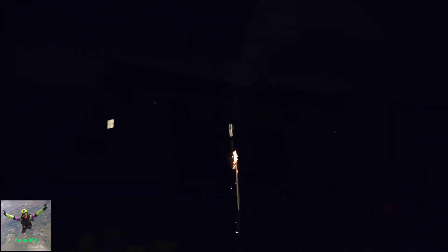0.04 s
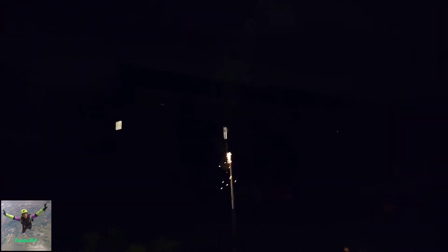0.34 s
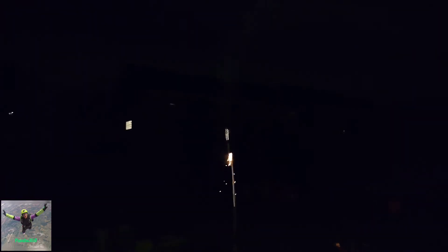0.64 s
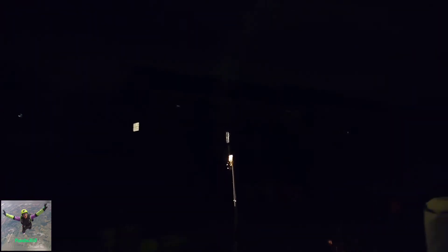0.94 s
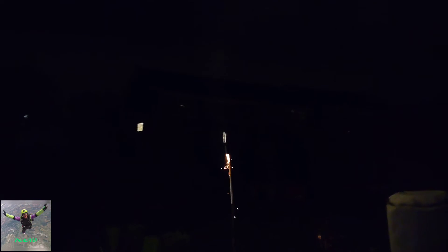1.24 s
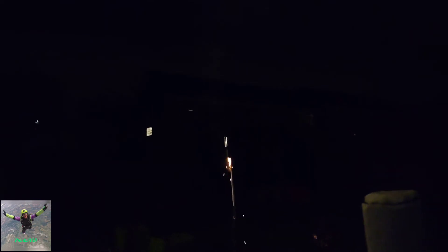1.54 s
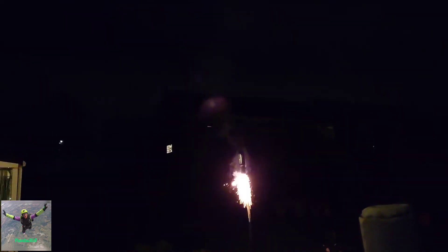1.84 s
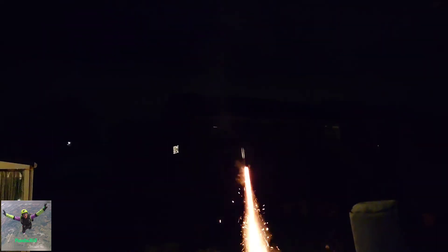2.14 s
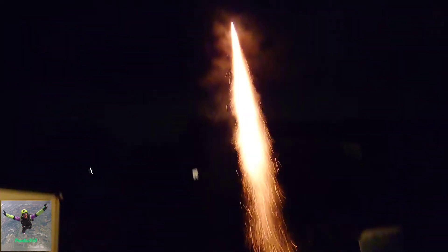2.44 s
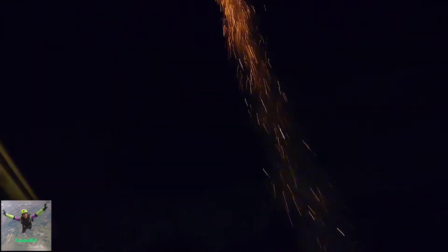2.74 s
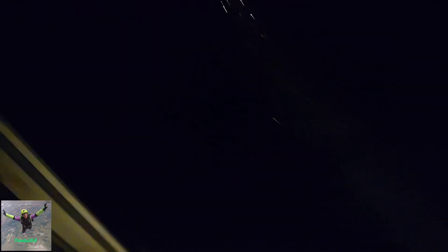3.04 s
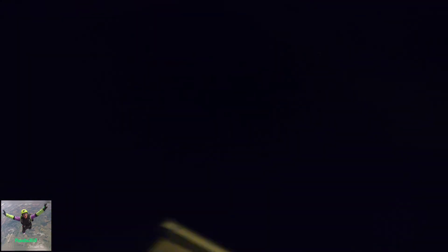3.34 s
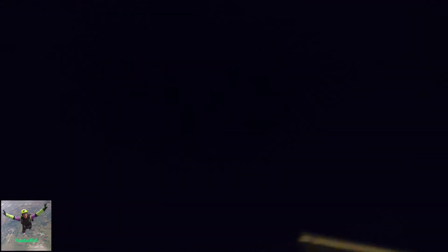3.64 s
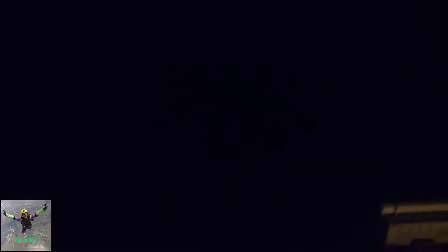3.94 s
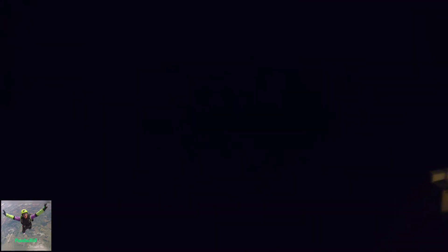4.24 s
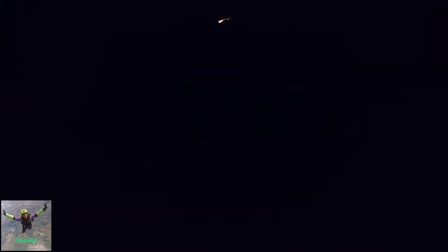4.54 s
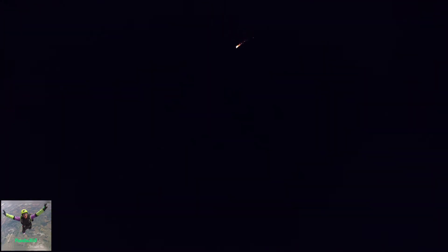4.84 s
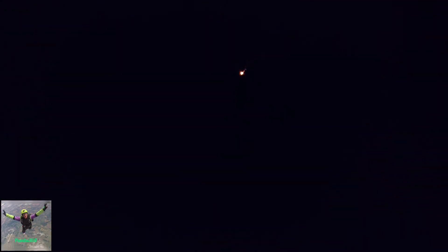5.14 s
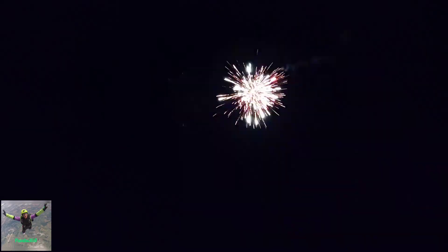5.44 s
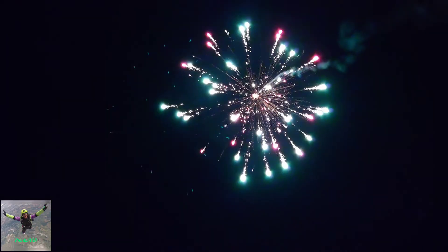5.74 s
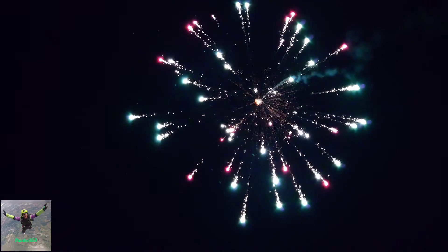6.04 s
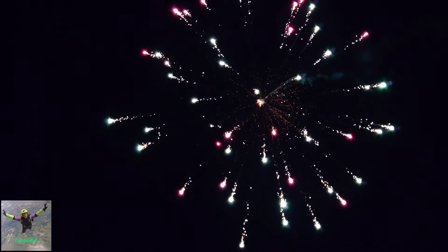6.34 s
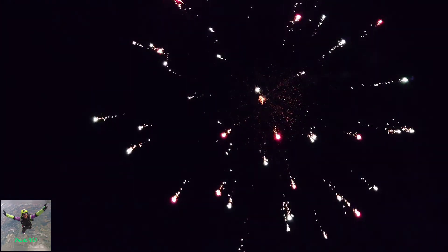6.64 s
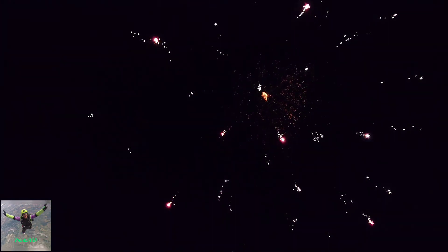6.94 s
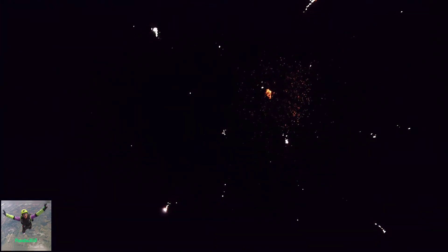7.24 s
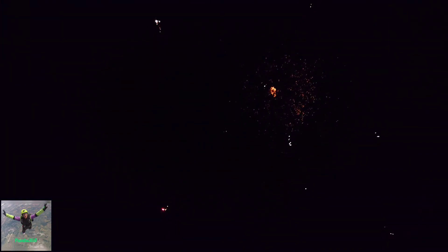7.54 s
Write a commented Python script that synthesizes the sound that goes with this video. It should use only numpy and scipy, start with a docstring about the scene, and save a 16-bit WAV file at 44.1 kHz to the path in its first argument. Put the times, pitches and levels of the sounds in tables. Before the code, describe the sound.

A firework fuse fizzes, the rocket launches with a loud whoosh, then bursts with a sharp echoing bang and crackling stars.

```python
"""A fuse fizzes in a yard at night, then flares as the powder of a firework rocket catches.
The exhaust roars upward, its tone swept by the ground echo, and the rocket coasts on a faint hiss.
The shell bursts with a shock that rolls among the houses; its stars sizzle and crackle.
All the while a finger lies over the left port of the hand-held microphone, muffling that side
and rubbing and bumping on it. Underneath are a far wash, fluttering air and a few dull knocks."""
import sys
import numpy as np
from scipy import signal
from scipy.fft import rfft, irfft
from scipy.io import wavfile
from scipy.ndimage import uniform_filter1d, map_coordinates

SR = 44100
rng = np.random.default_rng(int(sys.argv[2]) if len(sys.argv) > 2 else 0)


def generate_wav(signal):
    """Clip the signal to [-1, 1] and save it as 16-bit WAV at the path in sys.argv[1]."""
    frames = np.transpose(np.atleast_2d(signal))
    scaled = np.clip(frames, -1, 1) * 32767
    pcm = np.round(scaled).astype(np.int16)
    wavfile.write(sys.argv[1], SR, pcm)


N = 338678
TIME = np.arange(N) / SR
FRAME_S = np.arange(N // 128 + 5) * 128 / SR
BIN_HZ = np.fft.rfftfreq(512, 1 / SR)


def amp(db):
    """Decibels to gain."""
    return 10 ** (np.asarray(db) / 20)


def unit(x):
    """Scales to rms 1."""
    return x / np.sqrt(np.mean(x ** 2) + 1e-20)


def read(points, hz):
    """Reads a table along a log-frequency axis."""
    f, value = np.transpose(points)
    return np.interp(np.log(hz + 1), np.log(f + 1), value)


def follow(rows, t):
    """The columns of an automation table at the times t."""
    s, *columns = np.transpose(rows)
    return [np.interp(t, s, c) for c in columns]


def bell(x, centre, half_width):
    """A bell curve, 1 at the centre and 1/e a half-width away."""
    return np.exp(-((x - centre) / half_width) ** 2)


def burn(full_s, out_s, rise_db_per_s, fade_db_per_s):
    """Envelope that rises to 1 at full_s, holds until out_s and fades."""
    early, late = np.maximum(full_s - TIME, 0), np.maximum(TIME - out_s, 0)
    return amp(-rise_db_per_s * early - fade_db_per_s * late)


def swells(rows):
    """Envelope of overlapping swells, each fading as soon as it peaks."""
    return np.sqrt(sum((amp(db) * burn(s, s, rise, fade)) ** 2 for s, db, rise, fade in rows))


def add(mix, s, sound):
    """Adds a sound into the mix at s seconds."""
    part = mix[..., max(round(s * SR), 0):][..., :sound.shape[-1]]
    part += sound[..., :part.shape[-1]]


def colour(x, points, size=4096):
    """Minimum-phase EQ through (Hz, dB) points."""
    log_gain = np.log(amp(read(points, abs(np.fft.fftfreq(size, 1 / SR)))))
    taps = np.fft.ifft(np.exp(np.conj(signal.hilbert(log_gain)))).real[:size // 2]
    return signal.oaconvolve(x, taps.reshape((1,) * (x.ndim - 1) + (-1,)), axes=-1)[..., :x.shape[-1]]


# The finger's muffling EQ. Each row: frequency in Hz, gain in dB.
FINGER_EQ = [(100, -5), (250, 0), (900, -2.5), (1700, -8), (3300, -1), (4400, -3), (5600, -42.5),
             (11000, -23), (15000, -45)]
def covered(pair):
    """The finger muffles the left port."""
    return np.array([colour(pair[0], FINGER_EQ), pair[1]])


# Stereo image, narrow lows and wide highs. Each row: frequency in Hz, left-right correlation.
PORT_LIKENESS = [(60, 0.83), (130, .85), (290, 0.74), (640, 0.74), (1400, 0.14), (3000, 0.11),
                 (15000, 0.15)]
def ports(z, hz):
    """Two unrelated spectra become a stereo pair that shares its bass."""
    same = read(PORT_LIKENESS, hz)
    return np.array([same * z[1] + np.sqrt(1 - same ** 2) * z[0], z[1]])


def turbulence(field_db, patchy_db, flicker_db):
    """Shaped stereo noise, with eddies that swell in patches and a flicker across all bands."""
    a, b, c, d, patches = np.moveaxis(rng.standard_normal((len(FRAME_S), len(BIN_HZ), 5)), -1, 0)
    patches = unit(uniform_filter1d(uniform_filter1d(patches, size=12, axis=0), size=8, axis=1))
    flicker = unit(uniform_filter1d(rng.standard_normal(len(FRAME_S)), size=6))[:, None]
    z = ports([a + 1j * b, c + 1j * d], BIN_HZ) * amp(field_db + patchy_db * patches + flicker_db * flicker)
    return unit(signal.istft(z.swapaxes(1, 2), nperseg=512, noverlap=384)[1][:, :N])


def sparks(per_s, spread_db):
    """Random clicks, most small and a few large."""
    sizes = amp(spread_db * np.minimum(rng.exponential(1, N), 4)) * rng.choice([-1, 1], N)
    return sizes * (rng.random(N) < per_s / SR)


# The rocket's climb. Each row: time in seconds, turn of the exhaust toward the listener
# from 0 to 1, lag of the ground echo in ms.
FLIGHT = [(2.2, 0, 3.8), (2.45, .05, 5.2), (2.65, .3, 8.0), (2.82, .85, 9.9), (3.05, 1, 11.2),
          (3.3, 1, 11.3)]
def ground(pair, share):
    """Adds the ground echo; its lag grows as the rocket climbs, sweeping a comb down the sound."""
    lag_ms = follow(FLIGHT, TIME)[1]
    late = np.arange(N) - lag_ms * SR / 1000
    echo = np.array([map_coordinates(x, [late], order=3) for x in pair])
    return pair + share * colour(echo, [(1500, -1.5), (8000, -10.5)])


# The thin fizz and the fuller flares. Each row: frequency in Hz, gain in dB.
FUSE_EQ = [(150, -16), (400, -7.5), (1000, -12), (2000, -0.5), (3800, -7), (5400, -3), (6500, -6.5),
           (7600, -0.5), (10000, -11.5), (13500, -2.5), (15800, -7)]
FLARE_EQ = [(40, -15), (100, -32), (220, -5), (450, 0.5), (900, 3.5), (1700, 5), (2600, 1), (3800, -4),
            (5600, -3), (6800, -1.5), (7900, -1), (10500, -19), (14000, -11), (15800, -17)]
# The powder catches. Each row: crest in seconds, level in dB, rise and fade in dB per second.
POWDER_FLARES = [(1.88, -42, 400, 51.5), (1.948, -29.5, 450, 69), (2.195, -23.5, 199, 220.5)]
def fuse():
    """A fine fizz with tiny sparks, then flares that ring the nozzle as the motor catches."""
    end_s, sag_db_per_s = 1.92, 1.7  # quieter as it burns into the rocket
    nozzle_hz, nozzle_half_width_hz = 1870, 50
    fizz = turbulence(read(FUSE_EQ, BIN_HZ), patchy_db=0.8, flicker_db=1.0)
    spit = unit(colour(sparks(per_s=700, spread_db=1), FUSE_EQ))
    ring_db = 6.5 / (1 + ((BIN_HZ - nozzle_hz) / nozzle_half_width_hz) ** 2)
    flare = turbulence(read(FLARE_EQ, BIN_HZ) + ring_db, patchy_db=2, flicker_db=1.5)
    last_db = 6 * bell(TIME, end_s, 0.086)  # the last of the fuse flares on entering the nozzle
    glow = amp(-44 - sag_db_per_s * TIME + last_db) * burn(0, end_s, 0, fade_db_per_s=249.5)
    flame = glow * (fizz + amp(-20) * spit) + swells(POWDER_FLARES) * flare
    return covered(ground(flame, share=0.31))


# The distant, mid-heavy bed. Each row: frequency in Hz, gain in dB.
WASH_EQ = [(60, -36), (220, -12), (450, 0.5), (900, 3), (1700, 1.5), (2600, -9), (3800, -16.5),
           (7000, -26.5), (15000, -56)]
# The launch returns from afar, as one echo and a long tail.
# Each row: crest in seconds, level in dB, rise and fade in dB per second.
FAR_ECHOES = [(3.57, -39, 23, 36), (3.65, -43, 33, 1)]
def far_wash():
    """The wash of the surroundings, hollowed by the ground, swells as the launch echoes back."""
    envelope = np.hypot(amp(-54.5), swells(FAR_ECHOES))
    wash = envelope * turbulence(read(WASH_EQ, BIN_HZ), patchy_db=1.43, flicker_db=0.6)
    return covered(ground(wash, share=0.52))


# The low rumble of air. Each row: frequency in Hz, gain in dB.
FLUTTER_EQ = [(20, -1.5), (45, 0.5), (90, -1), (180, -8), (400, -15), (2000, -38.5)]
def air_flutter():
    """Air flutters over each port, slowly calming."""
    return amp(-56.5 - 0.4 * TIME) * unit(colour(rng.standard_normal((2, N)), FLUTTER_EQ))


# Finger slides. Each row: start in seconds, length in seconds, attack as a share of the length,
# level in dB, centre in Hz.
FINGER_RUBS = [(.006, .036, .24, -19.5, 473), (0.126, 0.015, .15, -32, 500), (.142, 0.038, .14, -38.5, 500),
               (0.22, 0.013, 0.18, -22, 745), (.225, 0.044, 0.074, -28, 1560), (.291, .12, 0.69, -38, 1600),
               (.426, .086, 0.2, -28.5, 1900), (0.606, 0.065, .08, -31, 1740),
               (0.735, 0.083, 0.65, -38.5, 1760), (0.868, 0.064, 0.81, -38.5, 1410),
               (1.121, 0.0089, .15, -36.5, 1800), (1.17, .03, 0.56, -40.5, 1920),
               (1.497, 0.018, .26, -42, 1490), (1.607, 0.085, .34, -40.5, 1930),
               (1.739, 0.07, 0.53, -34, 2000), (3.613, .0088, .2, -34, 2600),
               (3.876, .008, .2, -38.5, 2600), (4.183, 0.014, .1, -38.5, 1500),
               (4.213, 0.069, 0.35, -30, 500), (4.319, 0.034, 0.44, -29, 516)]
def finger_rubs():
    """Skin swishes over the left port; little reaches the right."""
    out, bins = np.zeros((2, N)), np.fft.rfftfreq(8192, 1 / SR) + 1
    for s, length, attack, db, hz in FINGER_RUBS:
        # the gap under the finger rings broadly; a little low push comes with it
        octaves = 0.86 * (1000 / hz) ** 0.47
        ring = np.exp(-.5 * (np.log2(bins / hz) / octaves) ** 2)
        push = amp(-8) / (1 + (bins / 450) ** 2)
        friction = irfft(rfft(rng.standard_normal(8192)) * (ring + push))
        swish = unit(colour(friction, [(4000, -13), (5500, -16)])[:int(length * SR)])
        stroke = np.interp(np.linspace(0, 1, len(swish)), [0, attack, 1], [0, 1, 0])
        add(out, s, amp([[db], [db - 40]]) * swish * np.sin(np.pi / 2 * stroke) ** 0.79)
    return out


# Finger presses. Each row: centre in seconds, peak in dB, speed of the swing in Hz.
FINGER_BUMPS = [(.007, -18, 151), (0.131, -27.5, 132), (.149, -31, 70), (0.231, -22.5, 124),
                (0.613, -33.5, 90), (4.187, -28.5, 90.5), (4.246, -17, 110), (4.265, -27, 91),
                (4.341, -17, 62.4), (5.429, -38, 120)]
def finger_bumps():
    """Each press on the left port is one pressure swing, a soft thump."""
    out, t = np.zeros((2, N)), np.arange(-SR // 40, SR // 40) / SR
    for s, db, hz in FINGER_BUMPS:
        turn = 2 * np.pi * hz * t
        thump = amp(db) * turn * np.exp(1 - abs(turn))
        add(out[0], s + t[0], thump[t + s >= 0])
    return out


# Faint knocks. Each row: start in seconds, relative level in dB, pitch in Hz.
DULL_KNOCKS = [(1.246, -34, 308), (3.988, -36, 366), (5.489, -37.5, 436)]
def knocks():
    """Small dull knocks some way off, each blurred into a short woody rustle."""
    out, t = np.zeros(N), np.arange(SR // 4) / SR
    for s, db, hz in DULL_KNOCKS:
        body_eq = [(hz / 2, -20), (hz, 0), (hz * 1.1, -3), (hz * 2, -17), (3000, -26), (8000, -45)]
        body = unit(colour(rng.standard_normal(len(t)), body_eq))
        add(out, s, amp(db - 5) * body * np.exp(-t / 0.026))
    return covered([out, out])


# The exhaust from the side, from behind, and the finger's EQ on it.
# Each row: frequency in Hz, gain in dB.
JET_SIDE_EQ = [(40, -33), (100, -24), (220, -18), (450, -17), (900, -8), (1700, 1.5), (2600, 0),
               (3800, -1.5), (5600, 1.5), (6800, 3), (7900, 7.5), (10500, -0.5), (14000, 2), (15800, -0.5)]
JET_BEHIND_EQ = [(40, -34), (100, -33), (220, -4), (450, -3), (900, -1), (1700, 2), (2600, -6), (3800, -7),
                 (5600, -5.5), (6800, -12), (7900, -4.5), (10500, -9), (14000, -15.5), (15800, -8.5)]
JET_FINGER_EQ = [(150, -3), (700, 5.5), (1600, -2), (2700, 4.5), (4500, -2.5), (6000, 4), (7100, -16),
                 (8500, 3), (12000, 2.5), (15000, -22)]
# A broad band that falls as the rocket passes overhead.
# Each row: time in seconds, centre in Hz, boost or cut in dB.
WHOOSH_SWEEP = [(2.27, 3000, -4), (2.33, 2770, 0.5), (2.55, 2790, 1.5), (2.7, 2230, -2), (2.85, 1380, 3),
                (3.03, 950, -0.5)]
# The finger eases off the left port and closes again. Each row: time in seconds, leak in dB.
FINGER_LEAK = [(2.165, -1.5), (2.204, 8), (2.265, 0.5), (2.335, 11.5), (2.45, 8.5), (2.6, 8), (2.8, 4),
               (2.89, 1.5), (3.1, -2)]
def jet():
    """The exhaust hisses from the side and roars deeper from behind; small shocks roughen it."""
    frames = FRAME_S[:, None]
    behind = follow(FLIGHT, frames)[0]
    whoosh_hz, whoosh_db = follow(WHOOSH_SWEEP, frames)
    right_db = (1 - behind) * read(JET_SIDE_EQ, BIN_HZ) + behind * read(JET_BEHIND_EQ, BIN_HZ)
    right_db += whoosh_db * bell(np.log2((BIN_HZ + 1) / whoosh_hz), 0, .4)
    roar_leak_db = follow(FINGER_LEAK, frames)[0]
    hiss_leak_db = -20.5 + 1.58 * roar_leak_db  # the hiss needs a wider gap than the roar
    hiss = read([(4400, 0.02), (6000, 1)], BIN_HZ)
    left_db = right_db + read(JET_FINGER_EQ, BIN_HZ) + (1 - hiss) * roar_leak_db + hiss * hiss_leak_db
    power_db = 10 * np.log10((amp(right_db) ** 2).mean(1, keepdims=True))
    roar = turbulence(np.array([left_db, right_db]) - power_db, patchy_db=2.0, flicker_db=-0.2)
    shocks = unit(colour(sparks(per_s=560, spread_db=0.5), JET_BEHIND_EQ))
    thrust = amp(-17) * burn(full_s=2.17, out_s=3.03, rise_db_per_s=560, fade_db_per_s=166)
    return thrust * ground(roar + amp(-10.5) * covered([shocks, shocks]), share=0.51)


def scatter(t60, per_s, seconds):
    """Reflections from walls and trees, each band dying at its own speed."""
    shape = (2, int(seconds * SR))
    taps = rng.standard_normal(shape) * (rng.random(shape) < per_s / SR)
    hz, t, z = signal.stft(taps, SR, nperseg=256)
    z = ports(z.swapaxes(1, 2), hz) * 10 ** (-3 * t[:, None] / read(t60, hz))
    tail = signal.istft(z.swapaxes(1, 2), nperseg=256)[1]
    return tail / np.linalg.norm(tail[1])


# The yard's tail. Each row: frequency in Hz, seconds to fall 60 dB.
YARD_DECAY = [(150, .72), (500, 0.77), (2200, 1.35), (5000, 1.01), (14000, .47)]
def yard(pair):
    """Three crossfading reverbs: the paths through the yard keep changing as the rocket moves."""
    out = np.zeros((2, N))
    for k in range(3):
        send = np.sqrt(2 / 3) * np.cos(2 * np.pi * (1.1 * TIME + k / 3))
        tail = scatter(YARD_DECAY, per_s=5000, seconds=0.97)
        out += signal.fftconvolve(pair * send, tail, axes=1)[:, :N]
    return out


# The motor coughs. Each row: centre in seconds, relative level in dB, half-width in seconds.
MOTOR_CHUFFS = [(2.208, -24, 0.0095), (2.592, -34, 0.013)]
def chuffs():
    """Uneven burning throws out low puffs, louder on the left."""
    surge = sum(amp(db) * bell(TIME, s, width) for s, db, width in MOTOR_CHUFFS)
    puff_eq = [(40, -18), (130, 3), (400, -3), (2000, -5.5), (6000, -27), (12000, -54)]
    return amp([[2], [-4]]) * surge * unit(colour(rng.standard_normal(N), puff_eq))


# The coasting hiss. Each row: frequency in Hz, gain in dB.
COAST_EQ = [(1500, -4), (3600, -8), (5500, 0.5), (6800, -13), (7900, -1), (10500, -15.5), (12800, -20),
            (15500, -30)]
# Its two swells. Each row: crest in seconds, level in dB, rise and fade in dB per second.
COAST_SWELLS = [(3.2, -42.5, 292, 17.5), (4.73, -48.5, 25, 18.5)]
def coast():
    """The delay charge burns high overhead with a thin, smooth hiss."""
    hiss = turbulence(read(COAST_EQ, BIN_HZ), patchy_db=.7, flicker_db=.4)
    return swells(COAST_SWELLS) * covered(ground(hiss, share=0.36))


def shock(edge_hz, push_s, rebound_s, rebound, low_hz):
    """A blast wave: sudden push, longer suction, and a weaker second shock as the air rebounds."""
    t = np.arange(SR // 20) / SR
    u, v = t / push_s, (t - rebound_s) / push_s
    wave = (1 - u) * np.exp(-u) + rebound * (v > 0) * (1 - v) * np.exp(-abs(v))
    wave = signal.lfilter(*signal.butter(2, low_hz, "high", fs=SR), wave)
    return signal.lfilter(*signal.butter(2, edge_hz, fs=SR), wave)


# The bang and its ground echo. Each row: start in seconds, relative level in dB, high cut in Hz.
BANGS = [(5.7538, 1, 7000), (5.765, 0, 2800)]
# Slapback off the house fronts. Each row: start in seconds, relative level in dB.
HOUSE_SLAPS = [(5.866, -14), (5.884, -13), (5.936, -17), (5.98, -18), (6.155, -18)]
# The bright opening crack and the dark roll after it. Each row: frequency in Hz, gain in dB.
CRACK_EQ = [(500, -15), (2500, -2), (5500, 0), (6700, -6), (8000, 10), (10500, -30), (15000, -9)]
ROLL_EQ = [(40, -24.5), (100, -5), (170, -2), (270, 1), (400, -10), (560, -16.5), (800, -12), (1100, -24.5),
           (1550, -14), (3000, -26.5), (7800, -30.5), (15000, -44)]
# The roll's tail. Each row: frequency in Hz, seconds to fall 60 dB.
ROLL_DECAY = [(60, 3.4), (150, 2.34), (280, 2.5), (1000, 7.3), (4000, 1.6), (14000, 1.2)]
def burst():
    """The shell bangs, splashes off the near walls, then slaps and rolls among the houses."""
    bang, echoes, start = np.zeros(N), np.zeros((2, N)), BANGS[0][0]
    for s, db, edge_hz in BANGS:
        wave = shock(edge_hz, push_s=0.0017, rebound_s=0.0027, rebound=0.2, low_hz=150)
        add(bang, s, amp(db + 1) * wave)
    slap = shock(edge_hz=520, push_s=0.0018, rebound_s=0.0042, rebound=0.4, low_hz=170)
    for s, db in HOUSE_SLAPS:
        add(bang, s, amp(db) * slap)
    # the casing tears with a brief ragged crack
    t = np.arange(SR // 20) / SR
    tear = unit(colour(rng.standard_normal(len(t)), CRACK_EQ))
    add(bang, start, tear * (amp(-16.5) * np.exp(-t / 0.0014) + amp(-35.5) * np.exp(-t / 0.021)))
    splash = scatter([(200, 0.071), (8000, 0.097)], per_s=9600, seconds=.5)
    splash_eq = [(60, -15), (250, -6), (700, -8), (2000, -11.5), (8000, -30), (15000, -44)]
    add(echoes, start + 0.004, amp(22.5) * colour(splash, splash_eq))
    roll = scatter(ROLL_DECAY, per_s=4000, seconds=2)
    add(echoes, start + .02, amp(31.5) * colour(roll, ROLL_EQ))
    return covered(bang + echoes)


def snap(length_s):
    """A tiny shock: a spike up and, length_s later, a spike down."""
    t = np.arange(64) / SR - .00012
    return bell(t, 0, .000048) - .9 * bell(t, length_s, .000058)


# The sizzle of the stars. Each row: frequency in Hz, gain in dB.
SIZZLE_EQ = [(40, -30), (100, -25), (220, 1), (450, -2.5), (900, -3.5), (1700, 2.5), (2600, -2.5),
             (3800, -10.5), (5600, -4), (6800, -16.5), (7900, -6.5), (10500, -24), (14000, -26.5),
             (15800, -46)]
def stars():
    """The stars light one after another, crest in a sizzling cloud and thin out into separate snaps."""
    crest_after_s, thinning_s = 0.89, .39
    age = np.maximum(TIME - BANGS[0][0], 0) / crest_after_s
    alive = np.exp(-np.maximum(age - 1, 0) * crest_after_s / thinning_s)
    snap_share, per_s = np.interp(alive, [0, 1], [0.54, 0.2]), 4200 * alive
    clump_db = 5 * bell(TIME, 7.372, .036)  # a clump of stars goes off together
    blaze = amp(-27.5 + clump_db) * (age * np.exp(1 - age)) ** 2.53
    sizzle = turbulence(read(SIZZLE_EQ, BIN_HZ), patchy_db=0.05, flicker_db=1.63)
    crackle, lengths = np.zeros((2, N)), (.00018, .00026, .0003, .00036)
    for length_s in lengths:
        snaps = signal.oaconvolve(sparks(per_s / len(lengths), spread_db=3.5), snap(length_s))[:N]
        # each part of the sky reaches the left port with its own delay
        crackle += [np.roll(snaps, rng.integers(-3, 8)), snaps]
    crackle = unit(crackle / np.sqrt(per_s))
    cloud = blaze * (np.sqrt(1 - snap_share) * sizzle + np.sqrt(snap_share) * crackle)
    return covered(ground(cloud, share=0.19))


def whistle(pitch_hz=1550, centre_s=6.025):
    """A short, slightly fuzzy whistle soon after the burst."""
    waver = unit(uniform_filter1d(rng.standard_normal(N), size=100))
    tone = np.sin(2 * np.pi * np.cumsum(pitch_hz * (1 + .02 * waver)) / SR)
    tone *= amp(-32) * bell(TIME, centre_s, .022)
    return covered([tone, tone])


# Accents in the crackle. Each row: start in seconds, relative level in dB.
STAR_POPS = [(6.7075, -16), (6.922, -17), (7.0653, -16), (7.0798, -12), (7.1648, -15), (7.2484, -15),
             (7.3402, -11.5), (7.3525, -13), (7.3716, -15), (7.4003, -8.5), (7.4115, -14), (7.448, -15),
             (7.5014, -15), (7.5611, -15.5), (7.6201, -9), (7.6308, -14), (7.6579, -17)]
def pops():
    """The loudest stars snap alone, each followed by its echo off the ground."""
    out = np.zeros(N)
    for s, db in STAR_POPS:
        add(out, s, amp(db + 2.5) * snap(length_s=rng.uniform(.00021, .00033)))
    return covered(ground(np.array([out, out]), share=.4))


def scene():
    """The rocket and its echoes, the night around it and the finger on the microphone."""
    motor = jet() + chuffs()
    rocket = fuse() + motor + amp(-12) * yard(motor) + coast() + burst() + stars() + pops() + whistle()
    return rocket + knocks() + far_wash() + air_flutter() + finger_rubs() + finger_bumps()


def record(dry):
    """A soft clip rounds the loudest peaks; a steep high cut follows."""
    ceiling, high_cut_hz = 0.88, 16000
    rounded = dry / (1 + (dry / ceiling) ** 4) ** (1 / 4)
    taps = signal.firwin(511, high_cut_hz, window=("kaiser", 9), fs=SR)
    return signal.oaconvolve(rounded, taps[None], "same")


dry = scene()
out = record(dry)
generate_wav(out)
```